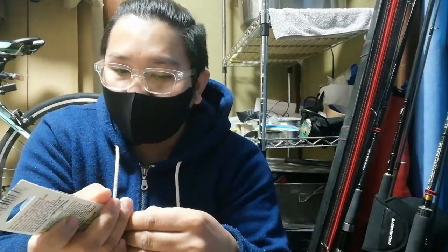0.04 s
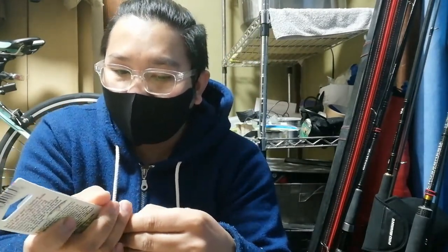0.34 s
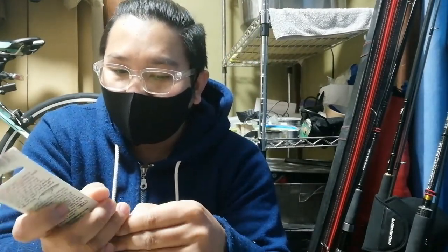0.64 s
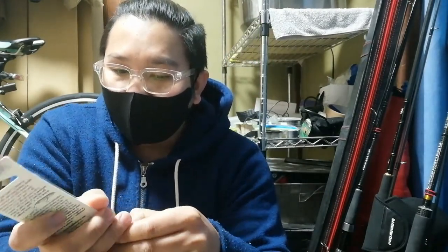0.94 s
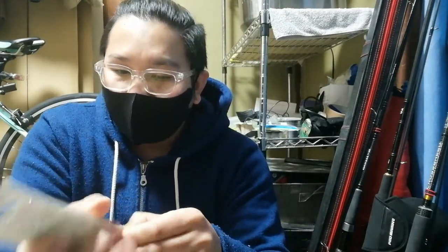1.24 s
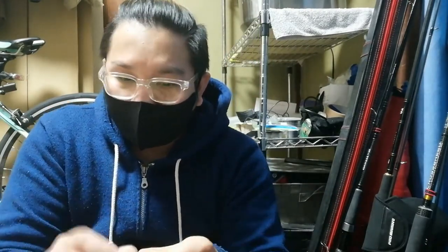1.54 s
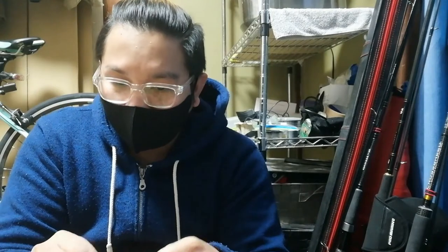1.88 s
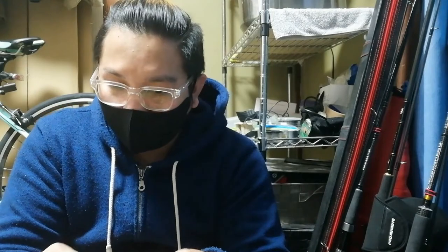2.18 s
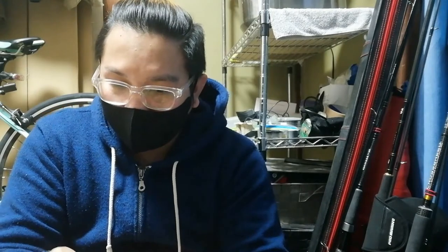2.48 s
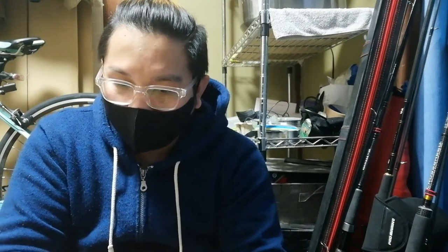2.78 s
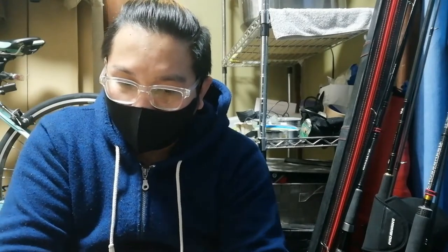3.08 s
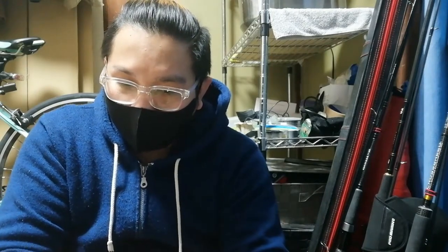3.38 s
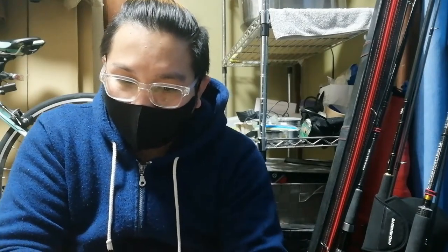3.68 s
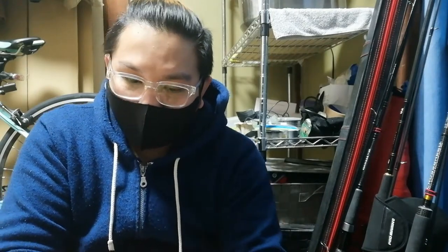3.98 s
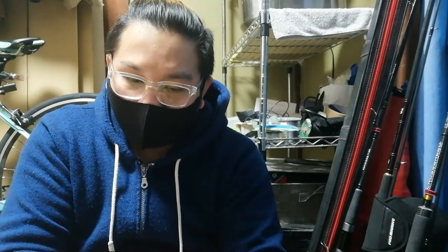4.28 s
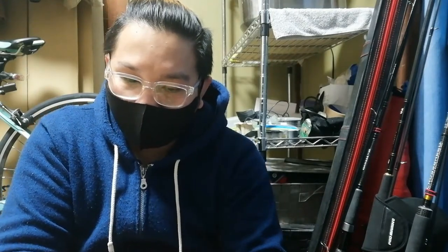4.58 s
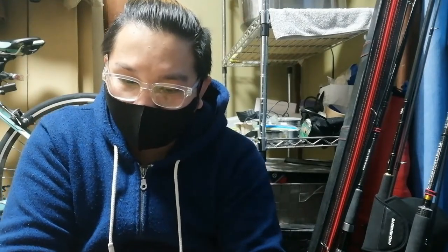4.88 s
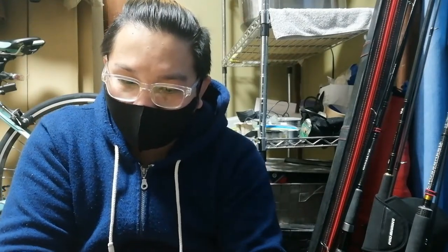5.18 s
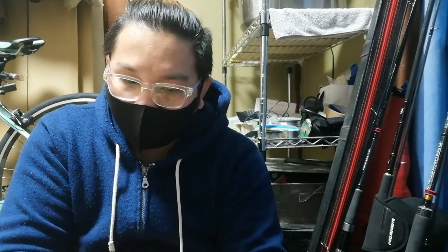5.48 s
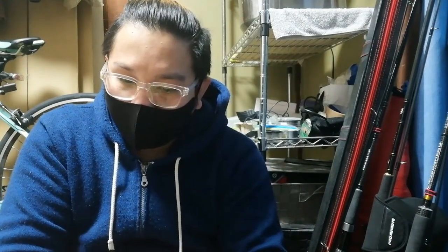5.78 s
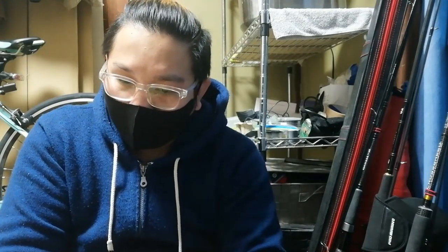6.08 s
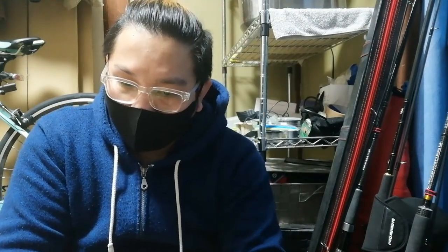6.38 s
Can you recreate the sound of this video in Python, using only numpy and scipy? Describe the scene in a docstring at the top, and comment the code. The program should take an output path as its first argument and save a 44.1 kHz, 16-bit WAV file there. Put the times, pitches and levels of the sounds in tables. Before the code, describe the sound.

Thin plastic packaging clicks and crinkles in irregular bursts as fingers rub it and tear its cardboard backing indoors.

```python
"""In a small, cluttered room, hands open a plastic blister pack on a table.
Finger rubs and brighter scrapes (the cardboard backing tearing, a sizzle on the loud rubs) are swarms
of tiny cracks. The thin shell snaps and crinkles as it buckles, sounds hollow when knocked, and
squeaks when a finger slips. Pressed down, the pack scrapes the table. Shelves and walls add a short
echo, and under it all lie a faint rumble, hum and hiss."""
import sys
import numpy as np
from scipy import signal
from scipy.fft import rfft, irfft, next_fast_len
from scipy.io import wavfile
from scipy.ndimage import uniform_filter1d

SR = 44100
rng = np.random.default_rng(int(sys.argv[2]) if len(sys.argv) > 2 else 0)


def unload_audio(sound):
    """Save the sound as a 16-bit wav file, at the path given as the first command line argument."""
    columns = np.transpose(np.atleast_2d(sound))
    # keep every value between -1 and 1, then stretch to whole-number steps
    steps = np.round(np.clip(columns, -1, 1) * 32767)
    wavfile.write(sys.argv[1], SR, steps.astype(np.int16))


N = 288414

# Finger strokes on the pack. Each row: start in seconds, length in seconds, middle-band level in dB,
# swell over the stroke in dB, then bass and treble in dB compared with the middle band.
RUB_STROKES = [(.70, 0.035, -77.5, 7, -1, -3), (1.175, .035, -72, 2, -1, 8),
               (1.415, 0.016, -47.5, 1, -8, -0.5), (1.69, 0.0715, -41, -3.5, -9, 1),
               (1.79, 0.054, -54.5, -8, -1.5, -9), (1.915, 0.042, -51, -4, 3, 3),
               (1.986, 0.07, -57.5, 1, -2, 1), (2.87, 0.022, -41, -5, -2.5, 5.5),
               (2.964, 0.06, -32.5, -6.5, -10, -0.5), (3.045, 0.025, -41, 2, -4, 0),
               (3.121, .048, -36, -4, -11, 0), (3.189, 0.12, -54, -7.5, -5, -12),
               (3.65, 0.26, -67, 11.5, -8.5, 0), (4.421, .31, -65, -1.5, -6.5, 0),
               (4.595, 0.052, -57, -8, -17, 4), (5.545, 0.11, -48, 1, -8, 1),
               (5.679, .14, -57.5, -6.5, -11, 0.5), (5.85, 0.068, -50, -8, -14, 5),
               (5.955, 0.034, -40, -13, -8, 1.5), (6.03, 0.32, -56.5, -7.5, -10.5, 3)]
# The borders in Hz of four bands: bass, middle, treble and air (the very highest sounds).
BAND_EDGES_HZ = [400, 1500, 6000, 11500, 16000]
# The points in Hz between which one band fades into the next.
BLEND_HZ = [1100, 1900, 5000, 7000, 9800, 13200]
# The band that rules at each of those points, from 0 for bass to 3 for air.
BLEND_BAND = [0, 1, 1, 2, 2, 3]
TAPS = 4096  # filter length in samples
HZ = np.fft.rfftfreq(TAPS, 1 / SR)
BLOW_S = .007  # a snap or knock holds the energy of a steady sound this long
ATTACK_S, ATTACK_PER_LENGTH, RELEASE_S, FADE_DB = 0.015, 0.33, .05, 35.5  # how strokes fade in and out


def amp(db):
    """Turns decibels into a number to multiply by."""
    return 10 ** (np.asarray(db) / 20)


def unit_power(x):
    """Scales x to an average power of one."""
    return x / np.sqrt(np.mean(x ** 2) + 1e-20)


def curve_at(points, hz):
    """Reads between the points of a table of frequencies and values."""
    point_hz, value = np.transpose(points)
    return np.interp(np.log(hz + 1), np.log(point_hz + 1), value)


def add(mix, start_s, sound):
    """Mixes a stereo sound in at the given time."""
    part = mix[:, max(round(start_s * SR), 0):][:, :sound.shape[1]]
    part += sound[:, :part.shape[1]]


def panned(x, pan_db):
    """Makes the left side pan_db louder than the right, keeping the total power."""
    return x * amp(np.outer([.5, -.5], pan_db)) / np.sqrt(np.cosh(pan_db * np.log(10) / 20))


def filtered(x, gain):
    """Filters x by a gain that is a function of frequency."""
    size = next_fast_len(x.shape[-1] + TAPS)
    return irfft(rfft(x, size) * gain(np.fft.rfftfreq(size, 1 / SR)), size)[..., :x.shape[-1]]


def impulse(gain):
    """How a filter with this gain curve rings after one click (its minimum-phase response)."""
    mirrored = np.r_[gain, gain[-2:0:-1]]
    log_gain = np.log(np.maximum(mirrored, 1e-5 * gain.max()))
    return np.fft.ifft(np.exp(np.conj(signal.hilbert(log_gain)))).real[None]


def resonance(hz, width_hz, db):
    """A bump in dB around a pitch at which something likes to ring."""
    return db / (1 + (2 * (HZ - hz) / width_hz) ** 2)


def shell_gain(colour, spot_db=0):
    """A broad tone colour, lifted by the shell's resonances or the struck spot's, whichever is higher."""
    # The shell's resonances. Each row: pitch in Hz, width in Hz, lift in dB.
    modes = [(1602, 150, 6), (1884, 124, 8.5), (2526, 150, 6.5), (3170, 120, -1), (4200, 140, -16),
             (4850, 90, -1), (7030, 220, 4.5), (8030, 190, -6)]
    shell_db = sum(resonance(*mode) for mode in modes)
    return unit_power(amp(curve_at(colour, HZ) + np.maximum(shell_db, spot_db)))


def band_strengths(gain):
    """How strong white noise is in each of the four bands after this gain."""
    bands = zip(BAND_EDGES_HZ, BAND_EDGES_HZ[1:])
    return np.sqrt([np.mean(gain ** 2 * (HZ >= low) * (HZ < high)) for low, high in bands])


def crack(ring_s, ring_share, alike, tick_s=.0003, rise_s=.0001, lag_s=.000043, size=1024):
    """A tick and the short ring of thin sheet; alike (0 to 1) is how well left and right match."""
    t = np.arange(size) / SR
    left, other = rng.standard_normal((2, size))
    noise = np.array([left, alike * left + np.sqrt(1 - alike ** 2) * other])
    tick = (1 - ring_share) * np.exp(-2 * t / tick_s) / tick_s
    ring = ring_share * np.exp(-2 * t / ring_s) / ring_s
    spectrum = rfft(noise * np.sqrt(tick + ring) * (1 - np.exp(-t / rise_s)))
    spectrum /= np.sqrt(uniform_filter1d(abs(spectrum) ** 2, size=45, axis=1))  # even out the tone
    spectrum[1] *= np.exp(-2j * np.pi * np.fft.rfftfreq(size, 1 / SR) * lag_s)  # reaches the right later
    fade_out = signal.windows.tukey(size * 2, .5)[size:]
    return unit_power(irfft(spectrum) * fade_out) / np.sqrt(size)


def grain(hz, ring_s, alike):
    """One tiny crack that rings at its own pitch."""
    gain = unit_power(amp(resonance(hz, width_hz=hz * 0.053, db=11)))
    return signal.fftconvolve(crack(ring_s, 0.59, alike), impulse(gain), axes=1)[:, :TAPS // 4]


def stroke_db(t, start, length, db, swell_db):
    """The hand takes hold, presses harder or eases off, and lets go."""
    corners = start + np.array([-ATTACK_S - ATTACK_PER_LENGTH * length, 0, length, length + RELEASE_S])
    corner_db = db + np.array([-FADE_DB, 0, swell_db, swell_db - FADE_DB])
    return np.interp(t, corners, corner_db, -np.inf, -np.inf)


def judder(t, depth_db=1.24, catch_s=.008, count=1500):
    """Sliding surfaces catch and let go, so the friction flutters in strength."""
    return amp(depth_db * np.interp(t, np.arange(count) * catch_s, rng.standard_normal(count)))


def friction(strokes, colour, air_db, air_per_treble, per_s, spread_db, ring_s, alike, count=14):
    """A swarm of tiny cracks of random size and pitch swells with each stroke of the hand."""
    sizes = amp(spread_db * np.minimum(rng.exponential(1, N), 4))
    sizes *= rng.random(N) < per_s / SR
    kinds = rng.integers(0, count, N)
    pitches = np.geomspace(1000, 11000, count) * rng.uniform(1.0, 1.05, count)
    cracks = [grain(hz, ring_s, alike) for hz in pitches]
    swarm = np.zeros((2, N))
    for i in np.flatnonzero(sizes):
        add(swarm, i / SR, sizes[i] * cracks[kinds[i]])
    power = abs(uniform_filter1d((swarm ** 2).mean(0), size=900))
    swarm /= np.sqrt(power + 1e-9)  # the hand feeds in steady power
    gain, t = shell_gain(colour), np.arange(N) / SR
    swarm = signal.oaconvolve(swarm * judder(t), impulse(gain), axes=1)[:, :N]
    levels = np.zeros((4, N))  # one loudness curve for each band
    for start, length, db, swell_db, bass_db, treble_db in strokes:
        tone = amp([bass_db, 0, treble_db, air_db + air_per_treble * treble_db])
        loudness = amp(stroke_db(t, start, length, db, swell_db))
        levels = np.maximum(levels, np.outer(tone, loudness))
    levels = uniform_filter1d(levels, size=260, axis=1) / band_strengths(gain)[:, None]
    return sum(level * filtered(swarm, lambda hz: np.interp(hz, BLEND_HZ, np.equal(BLEND_BAND, band)))
               for band, level in enumerate(levels))


def background(rumble_db=-60.5, hiss_db=-64.5):
    """The building's low rumble, a thin hiss and three slightly wavering hums."""
    # The tone colours of the rumble and the hiss. Each row: frequency in Hz, level in dB.
    rumble_colour = [(20, -1), (35, -8.5), (50, 3), (68, -11.5), (86, -1.5), (120, -10), (200, -10.5),
                     (270, -7.5), (350, -10), (410, -23), (550, -52), (900, -56)]
    hiss_colour = [(260, -54), (450, 0), (538, -3.5), (635, -8.5), (748, -6), (806, -3.5), (2700, -6.5),
                   (3000, -7.5), (3700, -7), (4300, -8), (9200, -7.5), (14800, -19), (16000, -16)]
    # The hums. Each row: pitch in Hz, level in dB.
    hums = [(48.6, -77.5), (86, -74), (340, -72)]
    # How well left and right match. Each row: frequency in Hz, likeness from 0 to 1.
    likeness = [(30, 1), (90, 0.94), (180, 0.96), (400, 0.06), (1500, 0.11), (12000, 0.022)]
    left, other = rng.standard_normal((2, N))
    shared = filtered(left, lambda hz: curve_at(likeness, hz))
    separate = filtered(other, lambda hz: np.sqrt(1 - curve_at(likeness, hz) ** 2))
    noise = np.array([left, shared + separate])
    rumble = unit_power(filtered(noise, lambda hz: amp(curve_at(rumble_colour, hz))))
    hiss = unit_power(filtered(noise, lambda hz: amp(curve_at(hiss_colour, hz))))
    t, hum = np.arange(N) / SR, np.zeros(N)
    for hz, db in hums:
        waver = 0.71 * np.interp(t, np.arange(20) / 2, rng.standard_normal(20))
        hum += amp(db) * unit_power(np.sin(2 * np.pi * hz * t + waver))
    return amp(rumble_db) * rumble + amp(hiss_db) * hiss + hum


def rubbing():
    """Fingers slide over the plastic in many tiny slips."""
    # The tone colour of a rub. Each row: frequency in Hz, level in dB.
    colour = [(210, -39), (350, -6), (452, -22.5), (685, -8), (1570, -1), (1700, -2.5), (2670, -3),
              (3080, 0), (4520, -6.5), (5940, -4.5), (6850, 8.5), (8710, 1.5), (9900, 12.5), (12600, -26),
              (16000, -26)]
    slips = friction(RUB_STROKES, colour, air_db=-22.5, air_per_treble=1.7,
                     per_s=1000, spread_db=4.2, ring_s=0.0039, alike=0.68)
    return panned(slips, pan_db=2.5)


def bright_scrapes():
    """Bright, crackly scraping strokes: tearing, and the brief high sizzle on the loud rubs near 3 s."""
    # The bright strokes. Each row: start and length in seconds, then level, swell, bass and
    # treble in dB, as for the rubs.
    strokes = [(.962, 0.029, -54, -5, 2, 8.1), (1.0, 0.041, -64.5, -5, -1, 5),
               (2.515, 0.2, -65.5, -1, -6, 7.8), (2.685, 0.053, -61.5, -1, -16, 6.7),
               (2.77, 0.12, -53.5, 12, -7.5, 4.6), (2.966, .02, -39.5, -3.5, -14, 4.1),
               (3.052, 0.012, -37, -5, -12, 6.3), (3.135, 0.019, -48, -5, -11, 5.9),
               (3.915, 0.28, -55, -2.5, -12.5, 11), (4.192, 0.064, -48.5, 6.5, -10.5, 10.5),
               (4.86, .1, -58.5, 11, -24, 7), (4.97, 0.025, -39, 7.5, -11, 2.6),
               (5.008, 0.047, -29, 1.5, -13, 2.9), (5.07, 0.11, -32, -12, -10.5, 1.1),
               (5.22, 0.067, -48, 4.5, -11.5, 6), (6.40, 0.06, -57, 16.5, -10.5, 4.3),
               (6.47, 0.047, -39.5, 7.5, -11.5, 5)]
    # Their tone colour. Each row: frequency in Hz, level in dB.
    colour = [(200, -43), (440, -35), (600, -28), (1100, -16.5), (1600, -9), (3000, 0.5), (5500, 1),
              (7000, 8.5), (8200, 15), (10000, 14.5), (12000, -3.5), (14800, -11.5), (16000, -20)]
    crackle = friction(strokes, colour, air_db=-12, air_per_treble=1.6,
                       per_s=1400, spread_db=3.5, ring_s=0.0023, alike=0.47)
    return panned(crackle, pan_db=1.0)


def snaps(crease_hz=8300, bounce_s=.0019, bounce_db=-10, room_db=-9.0):
    """The shell buckles, ringing the panel and crease that gave way; the table throws the crack back."""
    # The snaps. Each row: start in seconds, middle-band level in dB, bass and treble in dB compared
    # with it, left over right in dB, ring time in seconds, the panel's pitch in Hz.
    buckles = [(1.3769, -44.5, -17, 3, 1, 0.0063, 3320), (1.397, -42.5, -18, 1, -2, 0.014, 2880),
               (1.414, -43.5, -16, 3.5, 3, .007, 2200), (1.679, -28.5, -4, -7.5, 3, 0.008, 1960),
               (1.6892, -37, -5, 7, -1, 0.0046, 4460), (1.74, -42, -6, 4, 4, .01, 2500),
               (1.7726, -46, -4, 6.5, 2, 0.0061, 2430), (1.8158, -50.5, -6, -1.5, 1, .007, 2400),
               (1.8989, -34.5, -5.5, -9, -2, 0.0037, 2240), (1.938, -40.5, -3, -10, 1, 0.0045, 2450),
               (1.946, -47.5, -3, 9.5, 4, 0.0061, 1510), (2.0309, -44.5, -15, 6, 6, .003, 2530),
               (2.1758, -54.5, -3, -9, 0, 0.015, 1870), (2.2403, -48, -4, -4.5, 3.5, 0.012, 2580),
               (2.3302, -56.5, -5, 1.5, 4, 0.0039, 2000), (2.4329, -54.5, -2, -7.5, 2, 0.0063, 1600),
               (2.748, -35, -10, 1, 2.5, 0.0066, 1480), (2.7565, -38, 0, -9, 5, 0.0034, 2130),
               (2.8082, -30, -10, 1.5, 1.5, 0.0026, 3200), (2.8613, -18, -17, -0.5, 2.5, 0.0035, 1750),
               (2.9474, -47, -11, 7, 7, .005, 2070), (2.982, -28.5, -6.5, 3.5, 2, 0.007, 1990),
               (3.0398, -37, 5.5, 1, -2, 0.005, 1900), (3.0571, -33, -19, 10.5, -10, .0055, 1610),
               (3.1072, -37.5, -25, 8, -2, 0.013, 3070), (3.1506, -34.5, -20, 4, 3, 0.0024, 3100),
               (3.2036, -48.5, -8, 0, 3, 0.0014, 1220), (3.243, -48, -22, 11.5, 9, 0.0025, 4500),
               (3.834, -50, -11, 7, -2, 0.013, 1570), (4.1167, -51.5, -25, 17.5, 5, 0.00073, 5000),
               (4.2557, -59, -31, 22, -13, 0.0047, 5400), (4.2955, -46, -6, -5, 3, .004, 2550),
               (4.348, -27, -15, 6, 2, 0.0023, 3100), (4.7819, -21, -12.5, 2.5, 3, 0.0016, 3830),
               (5.0016, -26, -26, -1.5, 7, 0.0025, 4850), (5.009, -25, -19, -7, 13, 0.0062, 4040),
               (5.1363, -29.5, -23, 5, 2, 0.0082, 3070), (5.1414, -34.5, -11, 5.5, 6, 0.0032, 2950),
               (5.1601, -36.5, -24, 3, 4, 0.0024, 2990), (5.3351, -21.5, -14.5, 7, 1, 0.0026, 4520),
               (5.4899, -49.5, -8.5, -8, 4, 0.0041, 5360), (5.57, -37.5, -27, 7, 2.5, 0.0047, 3200),
               (5.585, -44, -23, 2, 2, 0.0068, 3500), (5.6018, -46.5, -17, 11.5, 4, 0.0028, 3140),
               (5.6158, -37, 1, -1, 3.5, 0.0028, 1340), (5.8747, -46, 2.5, -15, 0, 0.015, 1220),
               (5.9253, -41, -10, -2, -1, 0.0045, 3470), (5.95, -36, -3, -14, 1.5, .009, 2460),
               (6.081, -53.5, -8, 8.5, -3, 0.0037, 3200), (6.132, -45.5, -32, 4, -2, 0.011, 3140),
               (6.227, -47.5, -12, -3, 2, 0.0055, 3200), (6.2985, -36, -3, -4, 3, 0.0067, 1590),
               (6.3872, -52.5, -8, 6, 1, 0.0033, 2820), (6.4502, -40.5, -7.5, 6.5, -9, .011, 5100)]
    # The tone colour of a snap. Each row: frequency in Hz, level in dB.
    colour = [(150, -28), (450, -27.5), (750, -12), (1150, -9), (1700, -2.5), (3400, -1.5), (5300, -3.5),
              (8200, 0.5), (10500, -0.5), (12500, -5), (15500, -26)]
    near, into_room = np.zeros((2, 2, N))
    for start, db, bass_db, treble_db, pan_db, ring_s, panel_hz in buckles + crinkles():
        air_db = -18 + 0.22 * treble_db
        this_crease_hz = crease_hz * (1 + .1 * rng.uniform(-1.36, 1))
        panel = resonance(panel_hz, 0.27 * panel_hz, db=10)
        crease = resonance(this_crease_hz, 0.25 * this_crease_hz, db=4)
        gain = shell_gain(colour, panel + crease)
        band_logs = np.log(amp([bass_db, 0, treble_db, air_db]) / band_strengths(gain))
        tilt = np.exp(np.interp(HZ, BLEND_HZ, band_logs[BLEND_BAND]))
        body = impulse(gain * tilt) * amp(db) * np.sqrt(BLOW_S * SR)
        click = crack(ring_s, ring_share=.62, alike=0.3)
        snap = panned(signal.fftconvolve(click, body, axes=1), pan_db)
        add(near, start, snap)
        add(near, start + bounce_s * rng.uniform(.8, 1.4), snap * amp(bounce_db))
        add(into_room, start, body)  # the room gathers all directions, so the click's detail averages out
    return near + amp(room_db) * room(into_room)


def crinkles(per_s=16, pan_db=3, ring_s=0.0063, scatter_octaves=0.43, count=12):
    """Extra rows for snaps(): small buckles at random moments of a rub, following its strength."""
    rows = []
    for start, length, db, swell_db, bass_db, treble_db in RUB_STROKES:
        times = start + np.cumsum(rng.exponential(1, count)) / per_s
        for time, (scatter_db, pitch) in zip(times, rng.standard_normal((count, 2))):
            if time < start + length:
                level_db = stroke_db(time, start, length, db, swell_db) - 2 - scatter_db
                panel_hz = 2500 * 2 ** (scatter_octaves * pitch)
                rows.append((time, level_db, bass_db, treble_db + 2, pan_db, ring_s, panel_hz))
    return rows


def knocks(width_octaves=0.62, skirt_db=-27):
    """A soft blow rings the low, broad resonances of the hollow pack."""
    # The knocks. Each row: start in seconds, level in dB, centre pitch in Hz, left over right in dB.
    blows = [(2.6578, -37.5, 1120, 5.5), (3.708, -42.5, 790, 4), (3.849, -34, 1420, 1.5),
             (4.319, -46.5, 850, 6)]
    pack = shell_gain([(300, -34), (650, 4), (9000, -3)])
    skirt = amp(skirt_db) / (1 + (HZ / 4000) ** 2)  # a little sound far from the centre pitch
    out = np.zeros((2, N))
    for start, db, hz, pan_db in blows:
        hump = np.exp(-.5 * (np.log2((HZ + 1) / hz) / width_octaves) ** 2)
        body = impulse(unit_power((hump + skirt) * pack))
        tap = crack(ring_s=0.01, ring_share=0.97, alike=0.49, tick_s=0.00078)
        knock = signal.fftconvolve(tap, body, axes=1)
        add(out, start, panned(knock, pan_db) * amp(db) * np.sqrt(BLOW_S * SR))
    return out


def table_scrapes():
    """The hands press the pack down, and it scrapes the table with a low sound."""
    # The presses. Each row: start in seconds, level in dB, length in seconds.
    presses = [(2.97, -64, 0.14), (5.037, -59, 0.18), (5.589, -56.5, 0.1), (5.854, -82, 0.18),
               (6.279, -58, 0.068)]
    colour = [(80, -27), (180, 0.5), (300, 8.0), (450, -5.0), (900, -39)]  # each row: Hz, dB
    out = np.zeros((2, N))
    for start, db, length in presses:
        n = round(length * SR)
        drag = rng.standard_normal(n) + .5 * rng.standard_normal((2, n))
        scrape = unit_power(filtered(drag, lambda hz: amp(curve_at(colour, hz))))
        add(out, start, scrape * amp(db) * signal.windows.tukey(n, .6))
    return out


def squeaks(pitch_hz=3200, width_hz=380):
    """A slipping finger feeds one resonance of the shell, making a fuzzy whistle."""
    # The slips. Each row: halfway time in seconds, level in dB, length in seconds.
    slips = [(5.084, -37.5, 0.055), (5.21, -41.5, .042), (5.252, -45, .027), (5.619, -45, 0.043),
             (5.657, -47, 0.026), (5.751, -55, .018), (5.782, -55, 0.021), (5.858, -56, .03),
             (6.078, -46, 0.021), (6.14, -49, 0.039), (6.247, -45.5, 0.0095)]
    out = np.zeros((2, N))
    for middle, db, length in slips:
        n = round(length * SR)
        drag = rng.standard_normal(n) + 0.78 * rng.standard_normal((2, n))
        ring = unit_power(filtered(drag, lambda hz: 1 / (1 + (2 * (hz - pitch_hz) / width_hz) ** 2)))
        add(out, middle - length / 2, ring * amp(db) * signal.windows.tukey(n, .6))
    return out


def room(x, first_s=0.0023, build_s=0.0052, count=700):
    """Echoes from nearby shelves and walls, dying away fast."""
    # How long the room rings. Each row: frequency in Hz, seconds to fade by 60 dB.
    fade_times = [(300, 0.22), (1300, 0.13), (3500, 0.17), (9000, 0.13), (15000, 0.13)]
    echoes = np.zeros((2, SR // 2))
    arrivals = np.arange(count) * 20 + rng.integers(0, 20, (2, count))
    np.put_along_axis(echoes, arrivals, rng.choice([-1., 1.], arrivals.shape), 1)
    hz, t, spectrum = signal.stft(echoes, SR, nperseg=256)
    fade = np.exp(-np.log(1000) * t / curve_at(fade_times, hz)[:, None])
    tail = signal.istft(spectrum * fade, SR)[1]
    tail *= np.clip((np.arange(tail.shape[1]) / SR - first_s) / build_s, 0, 1)
    tail /= np.linalg.norm(tail, axis=1)[:, None]
    return signal.oaconvolve(x, tail, axes=1)[:, :N]


def microphone_ports(x, pan_db=-1):
    """The left and right microphone openings each favour their own frequencies."""
    # The lean to one side. Each row: frequency in Hz, left over right in dB.
    balance = [(200, -3), (650, 6), (1400, 0), (1870, -8), (2500, 8), (3100, 3.5), (3900, -1), (4900, 3.5),
               (6000, 3), (7200, 3), (8600, 12), (10300, -19), (12500, 6), (15000, -12)]
    return filtered(x, lambda hz: panned(1, curve_at(balance, hz) + pan_db))


def scene():
    """The pack and its echo, heard through two microphone openings, over the quiet background."""
    handling = rubbing() + bright_scrapes() + knocks() + squeaks() + table_scrapes()
    return background() + microphone_ports(handling + amp(-10.5) * room(handling) + snaps())


def record(dry, ceiling=.9, cutoff_hz=15800):
    """Flattens any peak above the ceiling, then removes the very highest treble."""
    low_pass = signal.firwin(255, cutoff_hz, window=("kaiser", 9), fs=SR)
    return signal.oaconvolve(np.clip(dry, -ceiling, ceiling), low_pass[None], "same")


dry = scene()
out = record(dry)
unload_audio(out)
```